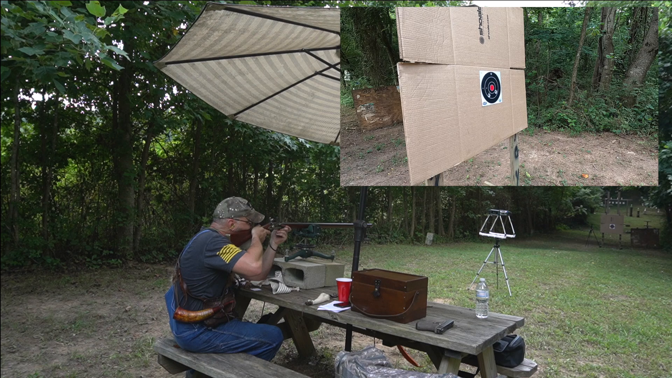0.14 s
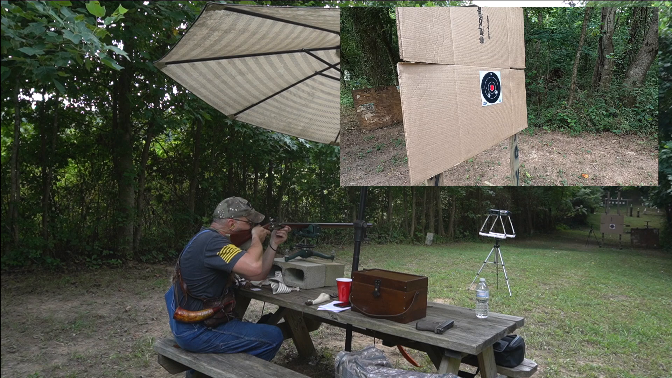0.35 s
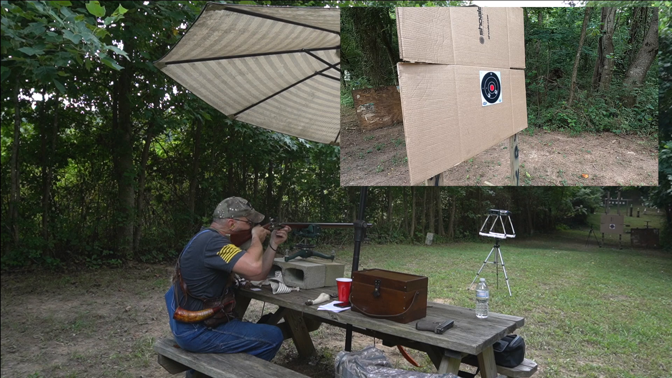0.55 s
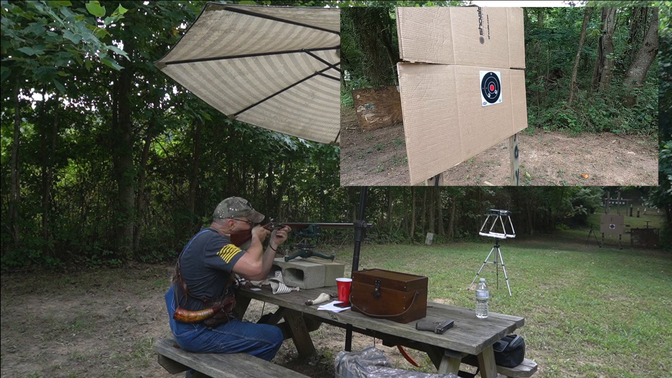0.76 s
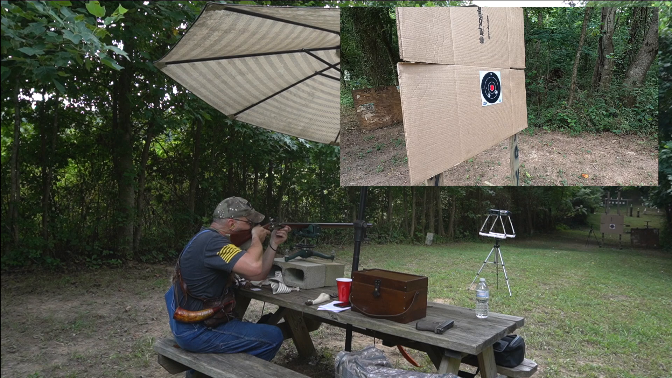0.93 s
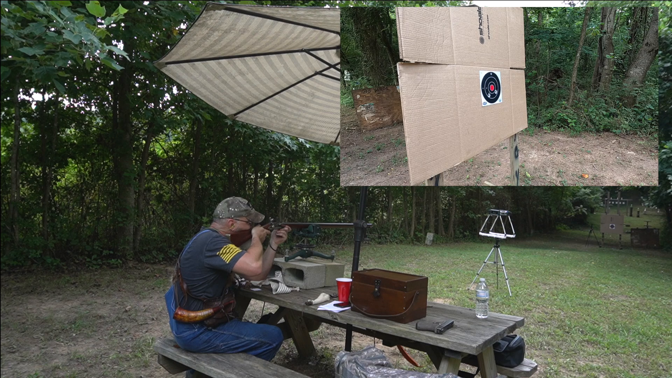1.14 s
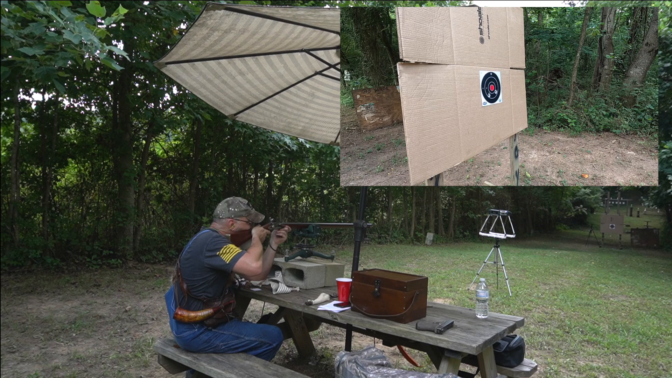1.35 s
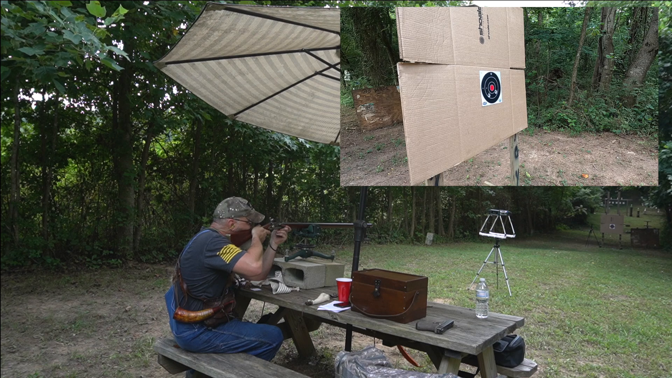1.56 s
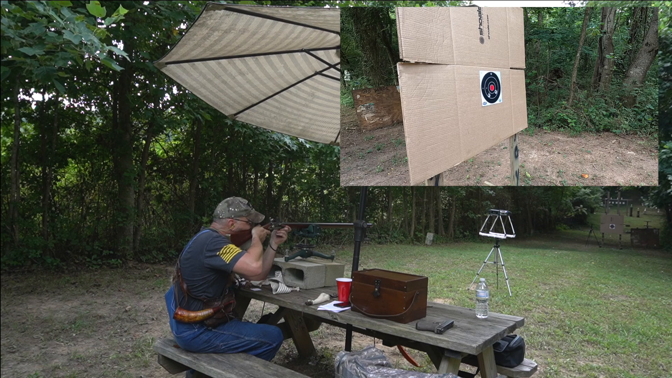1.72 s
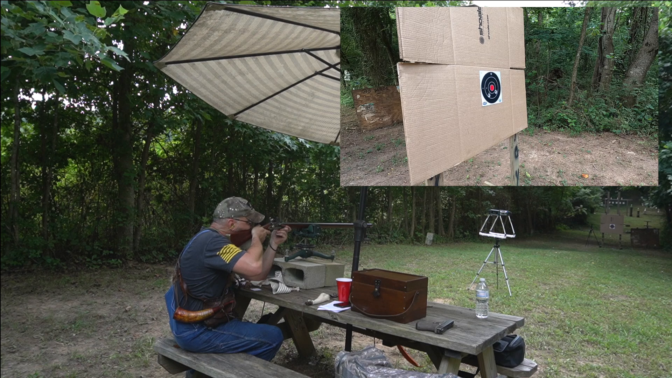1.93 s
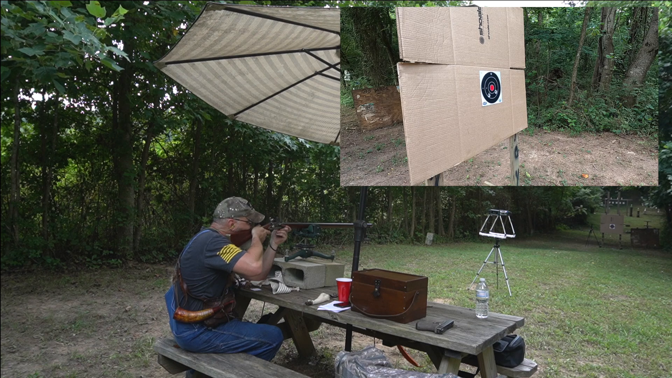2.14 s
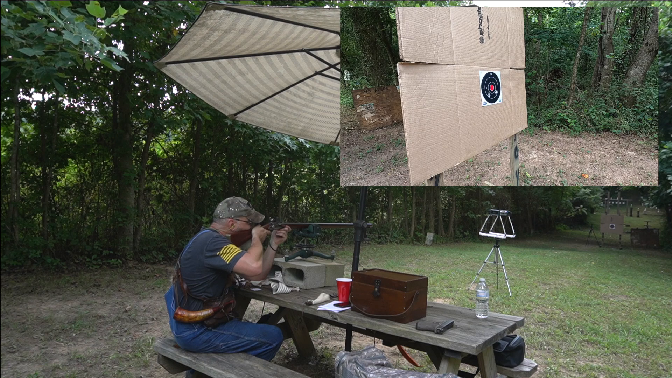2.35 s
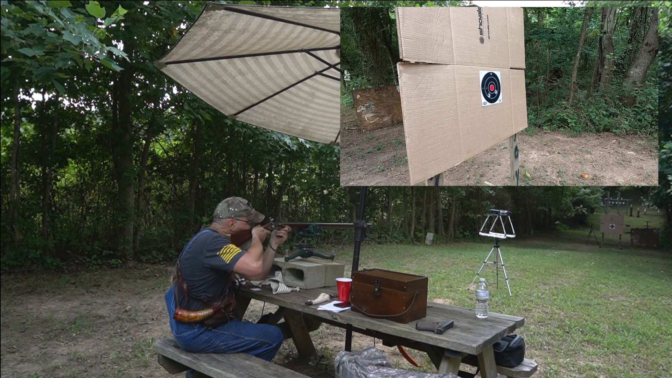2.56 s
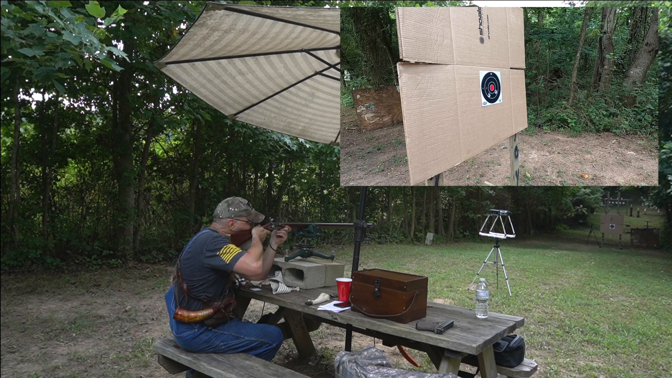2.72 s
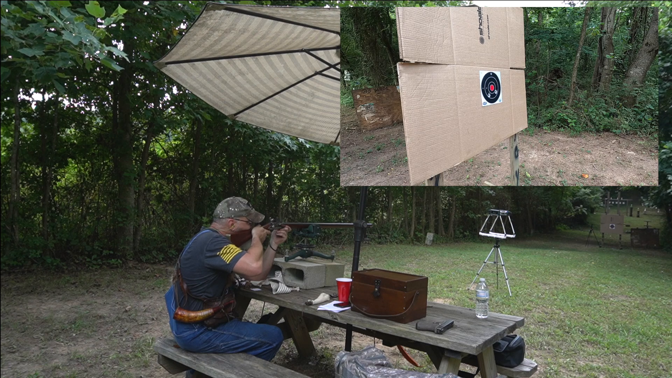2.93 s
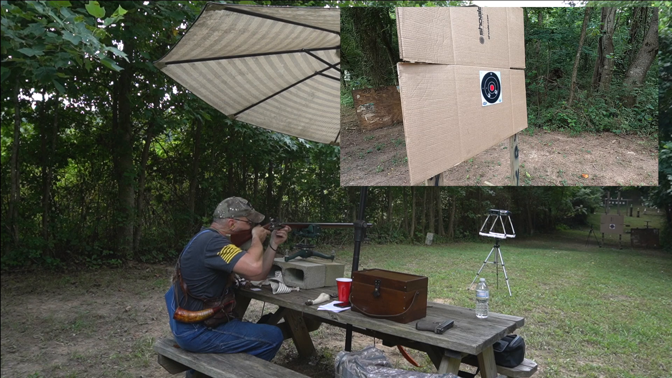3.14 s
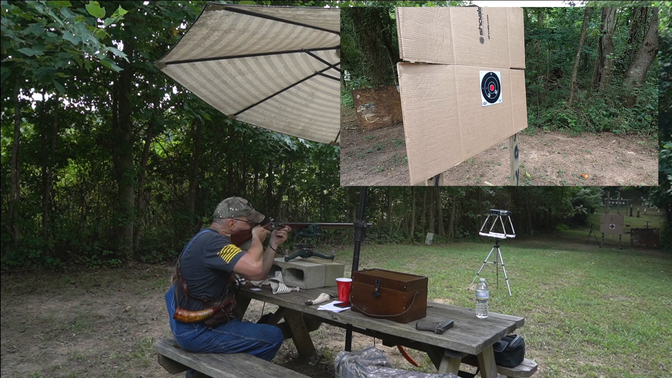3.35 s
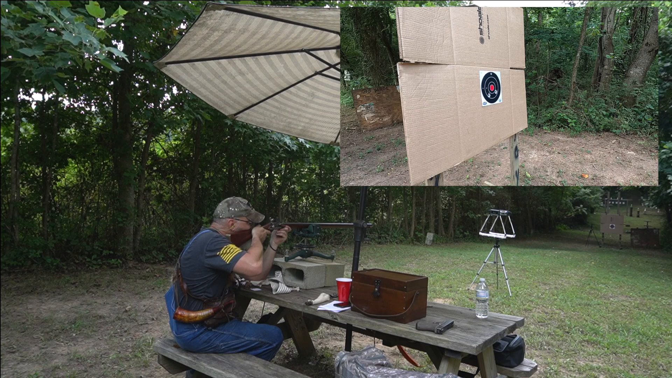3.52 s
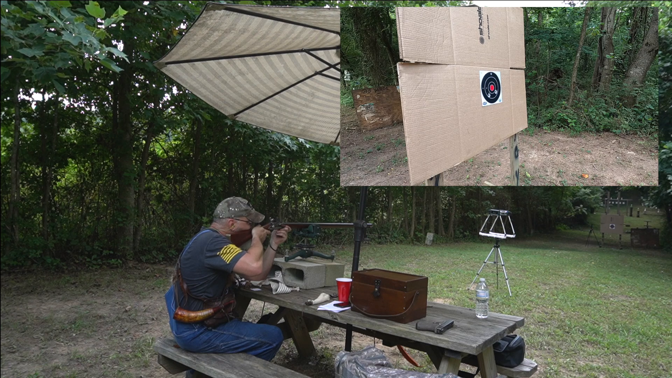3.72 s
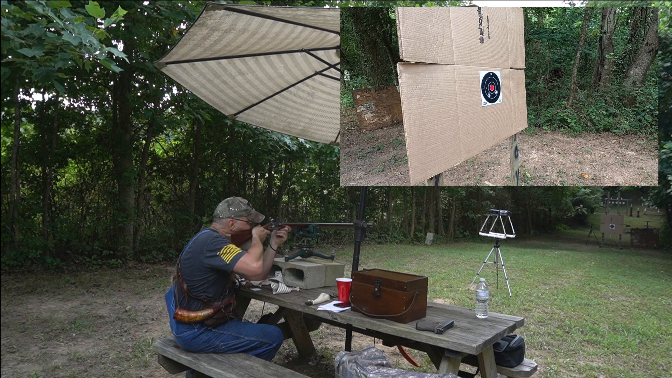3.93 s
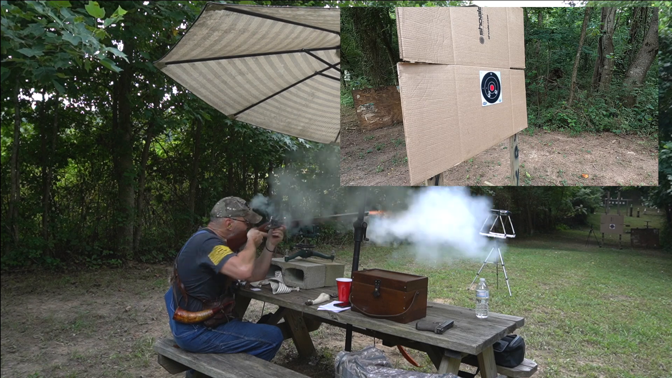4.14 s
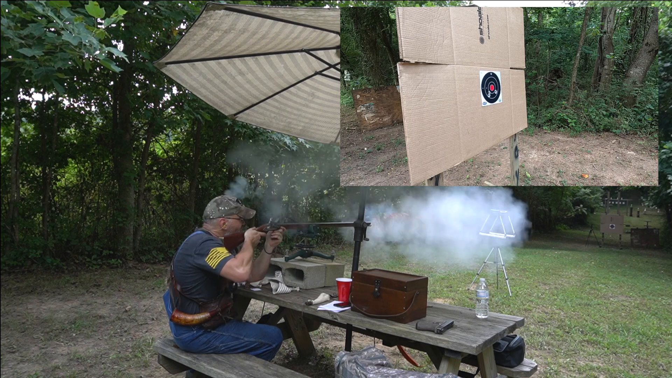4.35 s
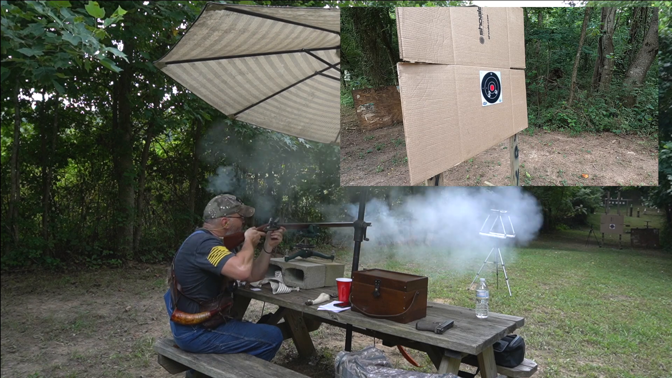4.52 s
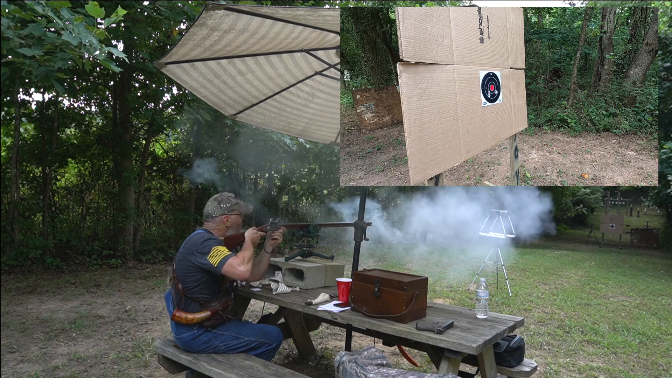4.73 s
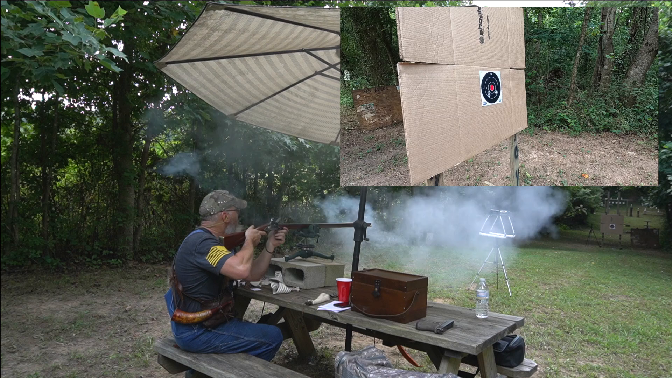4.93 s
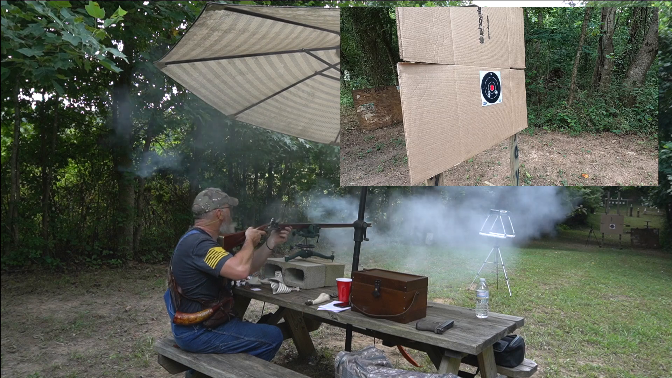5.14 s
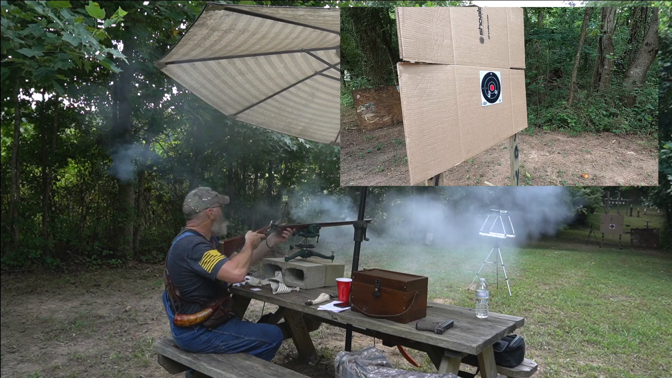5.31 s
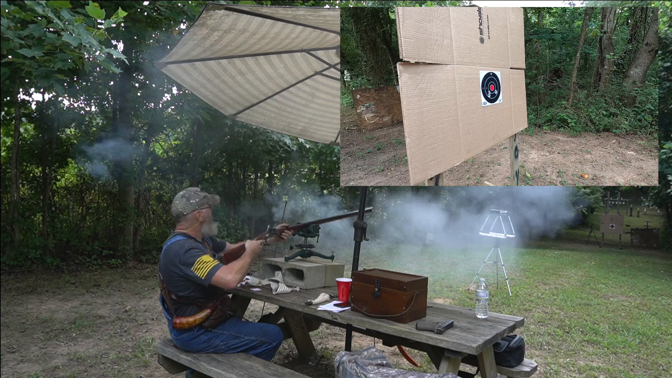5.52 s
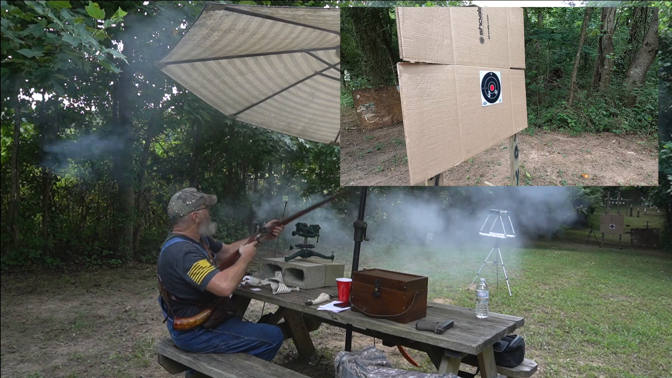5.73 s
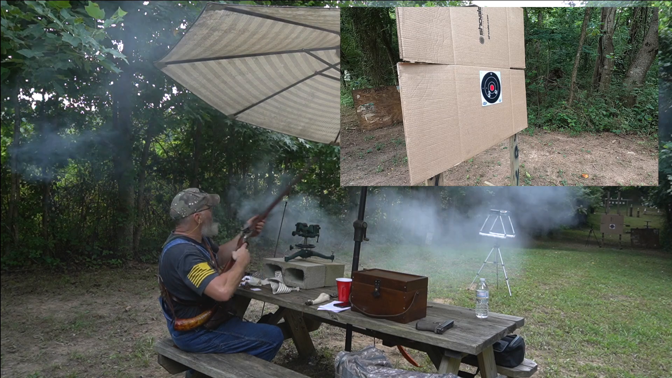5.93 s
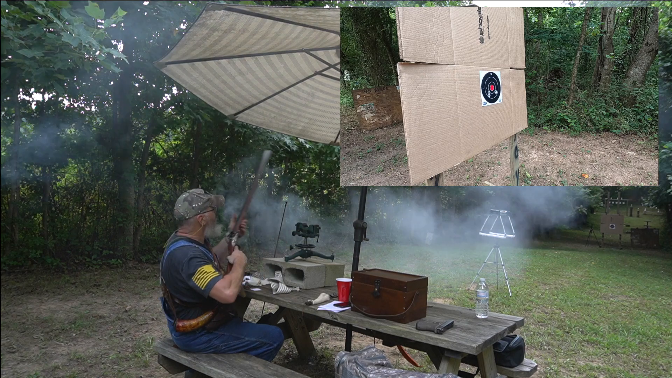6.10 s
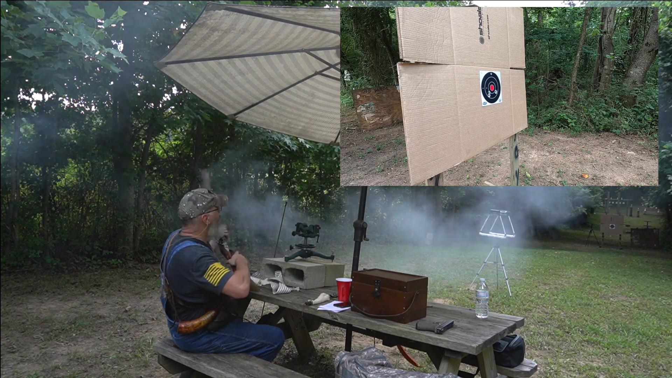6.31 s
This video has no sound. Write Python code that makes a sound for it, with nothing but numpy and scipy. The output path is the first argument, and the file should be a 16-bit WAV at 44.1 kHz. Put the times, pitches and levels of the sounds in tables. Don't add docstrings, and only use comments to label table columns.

```python
import sys
import numpy as np
from scipy import signal
from scipy.io import wavfile
from scipy.ndimage import uniform_filter1d

SR = 44100
rng = np.random.default_rng(int(sys.argv[2]) if len(sys.argv) > 2 else 0)


def makeup_ratio(level_db):
    decades = np.asarray(level_db, float) / 20
    return 10 ** decades


def to_wav(sig):
    pcm = np.clip(np.atleast_2d(sig), -1, 1) * 32767
    pcm = np.round(pcm).astype(np.int16)
    wavfile.write(sys.argv[1], SR, pcm.T)


N = 280917
T = np.arange(N) / SR

# (frequency [Hz], level [dB], wavering width [Hz])
ENGINE_ORDERS = [(46.3, -47.5, 0.74), (71, -50, 2.2), (88.4, -39, 2.1), (93.1, -48.5, 1.3),
                 (116.6, -43, 1.2), (139.4, -44, 0.51), (161, -53.5, 1.5), (178, -50, 1.5), (201, -62, 1.2),
                 (241, -68.5, 1.5), (250, -60, 1.7), (378, -65.5, 3.8)]
# (frequency [Hz], density [dB per Hz])
AIR_COLOUR = [(15, -35), (30, -22), (100, -9), (190, -12), (300, -20), (500, -24), (900, -29),
              (2000, -36.5), (3800, -39), (5300, -35.5), (6200, -70), (8800, -53), (11000, -67.5),
              (16000, -44.5)]
# (frequency [Hz], density [dB per Hz])
APART_COLOUR = [(15, -15), (25, 4), (73, -3), (330, -28), (800, -40), (1500, -48), (3000, -66), (7000, -66),
                (7700, -44), (8300, -33), (8900, -33), (9300, -60), (13000, -95)]
# (time [s], level [dB])
GUSTS = [(.04, -41), (.44, -51), (.7, -56), (.93, -55), (1.18, -42), (1.38, -42), (1.5, -34.5), (1.78, -42),
         (1.9, -38.5), (2.48, -49), (3.17, -41), (3.39, -43), (3.55, -44), (3.85, -44), (5.9, -41),
         (6.299, -48.5)]
# (start [s], end [s])
TRILLS = [
    (0.0, 1.536),
    (1.85, 2.35),
    (2.65, 6.4),
]
# (start [s], length [s], first pitch [Hz], settled pitch [Hz], level [dB])
BIRD_NOTES = [(.143, 0.02, 4380, 2360, -53), (0.236, 0.016, 4330, 2530, -48), (2.805, .1, 2750, 3160, -65),
              (3.04, .03, 4150, 3550, -56), (3.059, .06, 3000, 3130, -61), (3.238, 0.033, 4400, 3370, -50),
              (3.325, .025, 3680, 4500, -50), (3.429, 0.29, 2750, 3620, -55.5),
              (3.752, 0.035, 3650, 2800, -51.5), (3.754, .02, 4130, 4010, -51),
              (3.807, 0.099, 3150, 4250, -52.5), (3.898, 0.13, 4200, 4020, -58),
              (4.002, 0.03, 3800, 2800, -57), (2.108, .25, 1890, 1890, -63.5),
              (2.55, 0.17, 1830, 1900, -63), (3.29, 0.092, 1650, 1655, -58.5),
              (3.702, 0.21, 1890, 1876, -55.5)]
# (time [s], blow level [dB], ring pitch [Hz], base 60 dB decay, stretched 1.76-fold when rung
# [s])
LOCK_BLOWS = [(4.0368, 3, 2320, 0.0075), (4.0381, -8.5, 3170, 0.0026), (4.0387, 9, 3580, 0.0017),
              (4.0416, 2.5, 2170, 0.00412), (4.0428, -0.5, 2510, 0.016), (4.0432, -3.5, 8000, 0.0047),
              (4.0426, 3.5, 3080, 0.0062), (4.045, 5, 3930, 0.0053), (4.047, -2, 1140, 0.012),
              (4.0497, 0.5, 2520, .006), (4.0523, -16.5, 3700, .007), (4.052, -0.5, 1760, 0.005),
              (4.055, -7, 3500, 0.0048), (4.0571, -1.5, 1400, 0.0052), (4.06, -21.5, 3000, 0.017)]
# (time [s], pitch [Hz], level [dB])
LOCK_TICK = (5.795, 6000, -40)
# (time [s], hiss level [dB])
PAN_HISS = [
    (4.036, -70),
    (4.038, -19),
    (4.05, -14),
    (4.063, -23.5),
    (4.08, -13),
    (4.095, -19),
    (4.108, -23),
    (4.113, -14.5),
]
# (frequency [Hz], density [dB per Hz])
PAN_COLOUR = [(180, -30), (300, -14.5), (1840, -10.5), (2030, -8.5), (2980, -11.5), (3700, -4.5),
              (5610, -20.5), (13500, -25.5), (16000, -39)]
# (time [s], sign, length [s], level [dB])
PAN_PUFFS = [
    (4.0785, -1, .002, -5),
    (4.0845, 1, .0022, -1.5),
    (4.089, 1, .0018, -5),
    (4.096, -1, .003, -10),
]
# (time [s], rise [s], hold [s], level [dB])
CARD_TEAR = (4.137, .005, .022, -11)
# (frequency [Hz], density [dB per Hz])
CARD_COLOUR = [(150, -2), (400, -1), (1500, -15), (4000, -8), (5500, -34.5), (15000, -31)]
# (time [s], push length [s], level [dB])
MUZZLE = (4.1138, .0018, 34)
# (time [s], level [dB])
BRIGHT_BURSTS = [(4.412, 14.5), (4.4747, 16), (4.4914, -5), (4.53, 1), (4.576, -5), (4.647, -11),
                 (4.678, -18), (4.7466, -21), (4.787, -17), (4.8464, -21), (4.8703, -26.5), (4.91, -23)]
# (frequency [Hz], density [dB per Hz])
ROLL_COLOUR = [(18, -58), (35, -28), (80, 0.5), (115, 4), (190, -5.5), (265, -9.5), (480, -3.5),
               (720, -4.5), (950, -5), (1500, -13), (2500, -25), (4200, -32.5), (4900, -44.5),
               (15000, -80.5)]
# (frequency [Hz], loss [dB per s])
LEAF_LOSS = [(60, -10.5), (270, 10.5), (480, -2.5), (850, 3), (1500, 8.5), (2700, 17.5), (4200, 23),
             (6000, 33.5), (10000, 44.5), (16000, 51)]
# (time [s], depth [dB], recovery [s])
DUCKS = [
    (4.036, -3, .05),
    (4.112, -14, 4.57),
]

ROLL_S = 4.112


def evened(x):
    return x / np.sqrt(np.mean(x ** 2) + 1e-20)


def read(points, hz):
    f, value = np.transpose(points)
    return np.interp(np.log(hz + 1), np.log(f + 1), value)


def since(s):
    return np.maximum(T - s, 0)


def bell(t, centre, spread):
    return np.exp(-.5 * ((t - centre) / spread) ** 2)


def add(mix, s, sound):
    part = mix[round(s * SR):][:len(sound)]
    part += sound[:len(part)]


def resonate(x, hz, width):
    return signal.lfilter(*signal.iirpeak(hz, hz / width, fs=SR), x)


def wash(colour, loss=((1, 0), (2, 0)), path=np.zeros_like, patchy_db=0, size=1024, span=(0, N / SR),
         body=None):
    hz = np.fft.rfftfreq(size, 1 / SR)
    t = np.arange(span[0], span[1] + 2 * size / SR, size / 4 / SR)
    a, b, patches = rng.standard_normal((3, len(t), len(hz)))
    patches = uniform_filter1d(patches, size=8, axis=0)
    patches = evened(uniform_filter1d(patches, size=10, axis=1))
    gain_db = read(colour, hz) - np.outer(path(t), read(loss, hz))
    if body:
        gain_db = gain_db + body(t, hz)
    gain = makeup_ratio(gain_db)
    gain *= makeup_ratio(patchy_db * patches) / np.linalg.norm(gain, axis=1, keepdims=True)
    noise = signal.istft((gain * (a + 1j * b)).T, nperseg=size, noverlap=3 * size // 4)[1]
    out = np.zeros(N)
    add(out, span[0], evened(noise))
    return out


def push(length):
    u = np.arange(round(length * SR) * 10) / SR / length
    return (1 - u) * np.exp(-u)


def air():
    return makeup_ratio(-43.5) * wash(AIR_COLOUR, patchy_db=1.8, size=2048)


def engine():
    hz, db, width = np.transpose(ENGINE_ORDERS)[:, :, None]
    coarse = T[::64]
    z = rng.standard_normal((len(ENGINE_ORDERS), len(coarse), 2)) @ [1, 1j]
    wander = np.fft.ifft(z / (1 + (np.fft.fftfreq(len(coarse), coarse[1]) / width) ** 2))
    wander /= np.sqrt(np.mean(abs(wander) ** 2, axis=1, keepdims=True))
    turning = np.exp(2j * np.pi * (hz * coarse + rng.random(hz.shape)))
    lines = makeup_ratio(db) * ((1 + 0.26 * wander) * turning).real
    drone = evened(signal.resample_poly(lines.sum(0), 64, 1)[:N])
    return makeup_ratio(-35.5 + 4 * bell(T, 2.37, 0.56)) * drone


def wind():
    calm_db, gust_s = -61, 0.051
    gusts = makeup_ratio(calm_db) + sum(makeup_ratio(db) * bell(T, s, gust_s) for s, db in GUSTS)
    colour = [(12, -18.5), (28, 6), (55, 0.5), (110, -12.0), (300, -75.5)]  # (Hz, dB per Hz)
    return gusts * makeup_ratio(5.5) * wash(colour, size=4096)


def chorus(hz, width, per_s, depth):
    clicks, drift = rng.standard_normal((2, N))
    rate = per_s * (1 + .03 * evened(uniform_filter1d(drift, size=9000)))
    strokes = 1 + depth * np.cos(2 * np.pi * np.cumsum(rate) / SR)
    return evened(resonate(resonate(clicks * strokes, hz, width), hz, width))


def crickets():
    trill_db, rest_db, rise_s, fall_s = -50.5, -17, 0.035, 0.09
    chirp_db, gap_db, chirps_per_s, chirp_s = -54, -5.5, 3.8, 1.68
    high_db, hush_db, hush_s = -47.5, -9, 0.73

    pulsing = chorus(4915, 290, 135, 0.21)
    pulsing = pulsing + makeup_ratio(-19.5) * chorus(9950, 400, 135, 0.67)
    pulsing = pulsing + makeup_ratio(-21.5) * chorus(14900, 1700, 135, .6)
    high = chorus(7723, 700, 200, 0.17) + makeup_ratio(-24.5) * chorus(9200, 990, 200, .2)
    low = chorus(4544, 430, 64, 0.31)

    singing = np.zeros(N)
    for start, end in TRILLS:
        singing += np.minimum(since(start) / rise_s, 1) * np.clip(1 - since(end) / fall_s, 0, 1)
    gaps = .5 - .5 * np.cos(2 * np.pi * chirps_per_s * (T - chirp_s))
    hush = hush_db * (T > ROLL_S) * np.exp(-since(ROLL_S) / hush_s)

    out = makeup_ratio(trill_db + rest_db * (1 - singing) + 3.9 * hush) * pulsing
    out += makeup_ratio(high_db + hush) * high
    return out + makeup_ratio(chirp_db + gap_db * gaps + hush) * low


def birds():
    out = np.zeros(N)
    for s, length, first_hz, settled_hz, db in BIRD_NOTES:
        t = np.arange(0, length, 1 / SR)
        hz = settled_hz + (first_hz - settled_hz) * np.exp(-t / min(.024, .8 * length))
        swell = t / min(.04, .14 * length)
        edges = np.minimum(np.minimum(swell, (length - t) / .004), 1)
        pulses = np.sin(np.pi * 18 * t) ** 2 if settled_hz < 2300 else 1
        whistle = np.sin(2 * np.pi * np.cumsum(hz) / SR)
        add(out, s, makeup_ratio(db - 4 * t / length + 4) * edges * pulses * whistle)
    out = out * (1 + .4 * evened(uniform_filter1d(rng.standard_normal(N), size=500)))
    tail = rng.standard_normal(16000) * makeup_ratio(-60 * np.arange(16000) / SR / 1.0)
    smeared = signal.oaconvolve(out, tail / np.linalg.norm(tail))[:N]
    return makeup_ratio(-2) * out + makeup_ratio(2) * smeared


def impact():
    s, rise, hold, db = CARD_TEAR
    attack = np.minimum(since(s) / rise, 1)
    after = since(s + rise + hold)
    burst = attack * np.clip(1 - after / .008, 0, 1)
    tail = attack * makeup_ratio(-22 - 62 * after)
    grit = signal.lfilter(*signal.butter(2, 1400, fs=SR), rng.standard_normal(N))
    thud = makeup_ratio(-24.5) * burst * evened(grit)
    tear = np.maximum(makeup_ratio(db) * burst, tail) * wash(CARD_COLOUR, size=256, span=(4.1, 4.45))
    return tear + np.array([thud, -thud])


def lock():
    out, t = np.zeros(N), np.arange(800) / SR
    for s, db, hz, t60 in LOCK_BLOWS:
        ring = makeup_ratio(db - 60 * t / (1.76 * t60)) * np.sin(2 * np.pi * hz * t)
        add(out, s, ring * np.minimum(t / 0.0001, 1))
        sparks = makeup_ratio(db - 6.5 - 60 * t / 0.0033) * rng.standard_normal(len(t))
        add(out, s, sparks)
    for s, sign, length, db in PAN_PUFFS:
        softened = uniform_filter1d(np.pad(push(length), (60, 0)), 70)
        add(out, s, sign * makeup_ratio(db) * softened)
    s, hz, db = LOCK_TICK
    add(out, s, makeup_ratio(db - 60 * t / .008) * np.sin(2 * np.pi * hz * t))
    times, levels = np.transpose(PAN_HISS)
    burning = (T > times[0]) & (T < times[-1])
    hiss = wash(PAN_COLOUR, size=256, span=(4, 4.2))
    return out + burning * makeup_ratio(np.interp(T, times, levels)) * hiss


def leaves(t):
    longer = 1.4 / (1 + np.exp((ROLL_S + 0.55 - t) / .21))
    shortcut = 0.2 * bell(t, 5.43, .1)
    return -1.208 + longer - shortcut


def grazing(t, hz):
    first_hz, last_hz, sink_s, octaves, lift_db = 1800, 500, .36, .32, 5
    centre = last_hz + (first_hz - last_hz) * np.exp(-np.maximum(t - ROLL_S, 0) / sink_s)
    return lift_db * bell(np.log2((hz + 1) / centre[:, None]), 0, octaves)


def roll():
    noise = wash(ROLL_COLOUR, LEAF_LOSS, leaves, patchy_db=.6, span=(4, N / SR), body=grazing)
    rumble = signal.sosfiltfilt(signal.butter(2, 260, fs=SR, output="sos"), noise)
    u = since(ROLL_S)
    hold_s, knee_s = 0.88, 0.028
    near = makeup_ratio(33.5 - 64.5 * u)
    far = makeup_ratio(5.5 - 19.5 * knee_s * np.logaddexp(0, (u - hold_s) / knee_s))
    both = np.hypot(near, far)
    low = np.hypot(near * makeup_ratio(1), far * makeup_ratio(-6.5 + 5 * u))
    return np.minimum(u / 0.012, 1) ** 1.62 * (both * (noise - rumble) + low * rumble)


def shot():
    out, swell_db, t = np.zeros(N), np.zeros(N), np.arange(400) / SR
    for at, burst_db in BRIGHT_BURSTS:
        add(out, at, makeup_ratio(burst_db - 60 * t / .012) * rng.standard_normal(len(t)))
        add(swell_db, at - .003, 4.8 * np.hanning(len(t)))
    out = signal.lfilter(*signal.butter(1, [3500, 12000], "band", fs=SR), out)
    s, length, db = MUZZLE
    add(out, s, makeup_ratio(db) * push(length))
    return out + makeup_ratio(swell_db) * roll()


def scene():
    boom, gusts = shot(), wind()
    mid = air() + engine() + gusts + crickets() + birds() + lock() + boom
    side = makeup_ratio(-53) * wash(APART_COLOUR, patchy_db=3, size=2048) + .4 * gusts
    late = np.roll(boom, 300)
    side += makeup_ratio(-42) * signal.lfilter(*signal.butter(2, [450, 1500], "band", fs=SR), late)
    return np.array([mid + side, mid - side])


def roll_off(x):
    return signal.sosfilt(signal.butter(12, 16780, fs=SR, output="sos"), x)


def record(dry):
    release = np.tanh((T - 4.6) / 0.0407)
    ceiling = makeup_ratio(8.5 + 6.5 * (.5 + .5 * release))
    gain_db = -3.5 - 1.06 * release
    for s, db, recovery in DUCKS:
        gain_db += db * (1 - np.exp(-since(s) / .006)) * np.exp(-since(s) / recovery)
    over = dry / ceiling
    squared = ceiling * over / (1 + abs(over) ** 6) ** (1 / 6)
    sagging = signal.lfilter(*signal.butter(2, 23, "high", fs=SR), squared)
    ringing = sagging + .38 * resonate(sagging, 3900, 1500)
    hiss = makeup_ratio(-75.0) * np.diff(rng.standard_normal(N + 1))
    ducked = np.clip(ringing * makeup_ratio(gain_db) + impact(), -1, 1) + hiss
    edged = signal.sosfilt(signal.ellip(10, .1, 70, 15850, fs=SR, output="sos"), ducked)
    return roll_off(edged)


dry = scene()
out = record(dry)
to_wav(out)
```